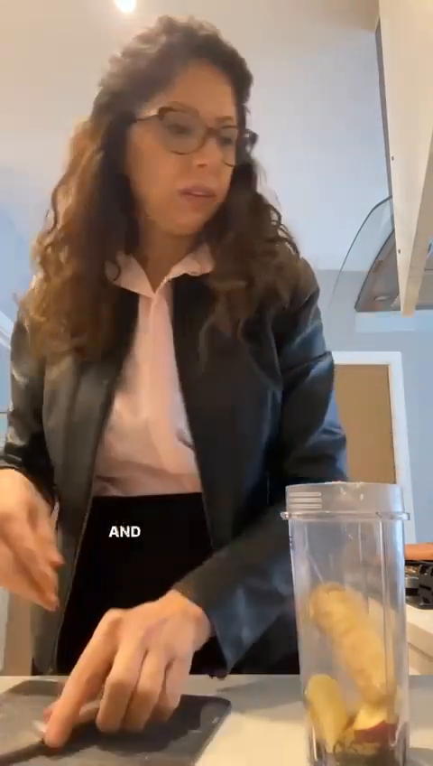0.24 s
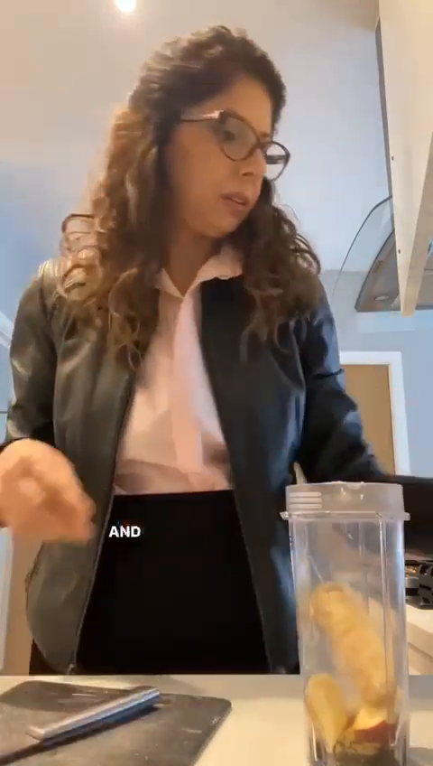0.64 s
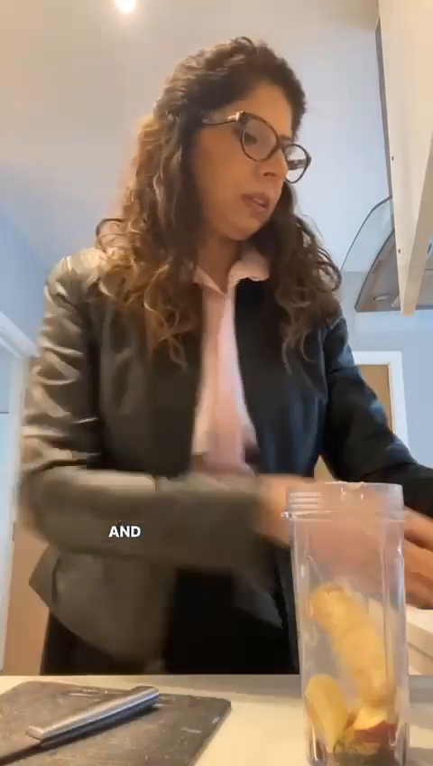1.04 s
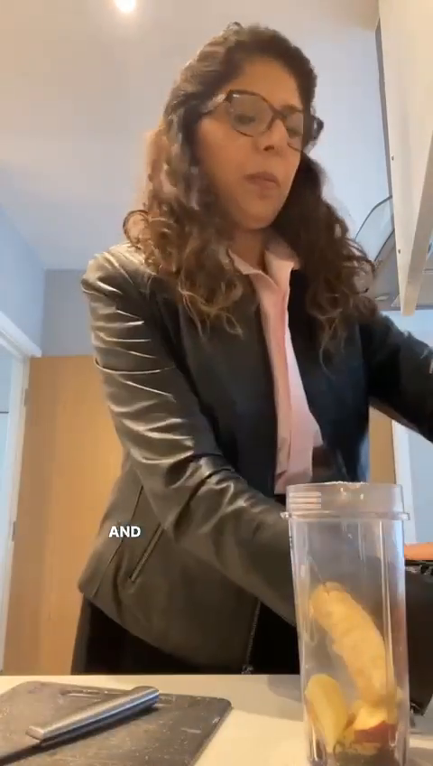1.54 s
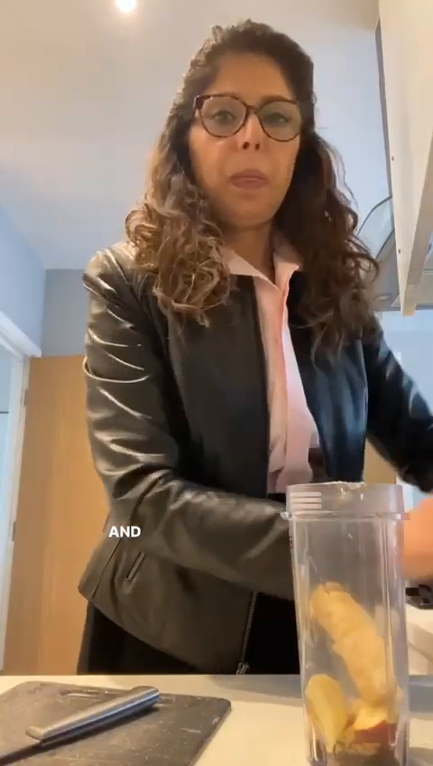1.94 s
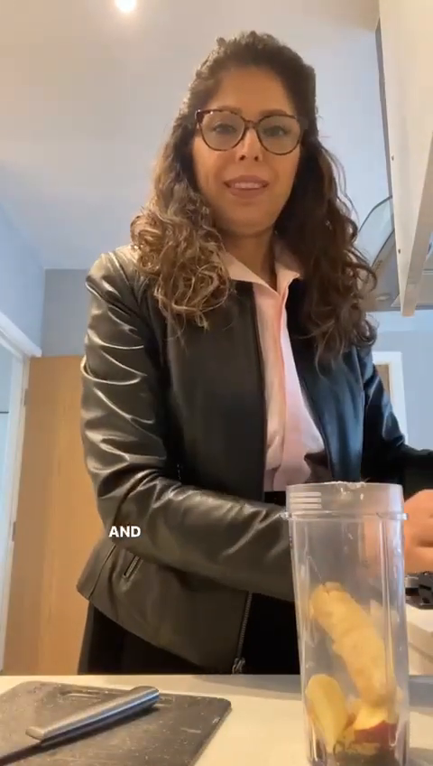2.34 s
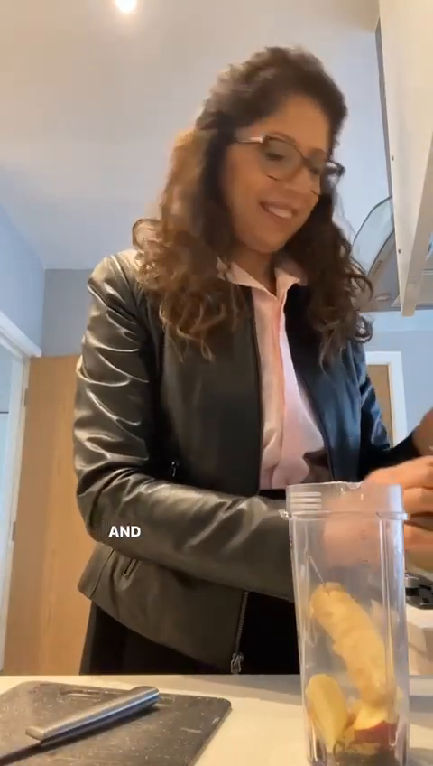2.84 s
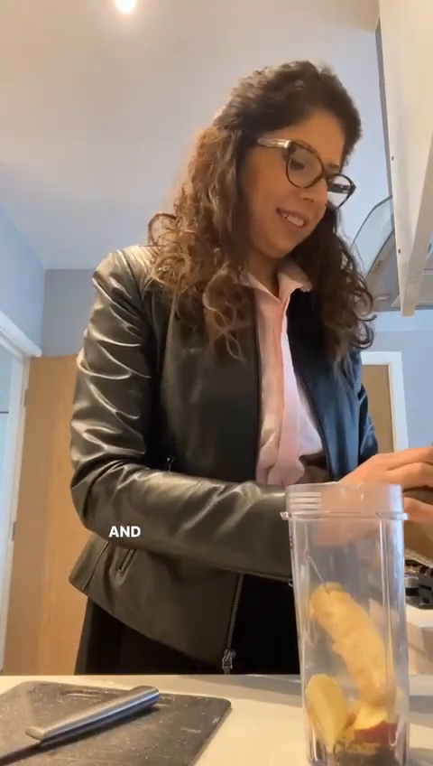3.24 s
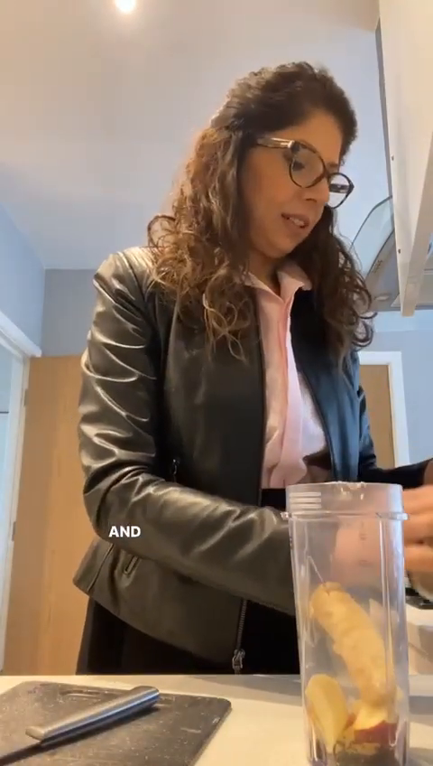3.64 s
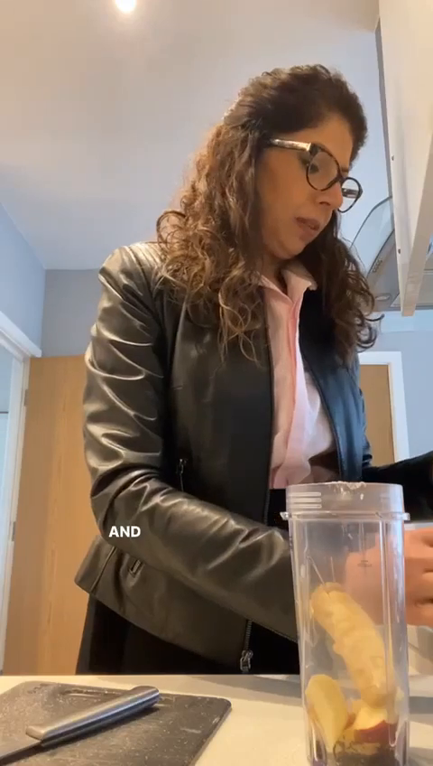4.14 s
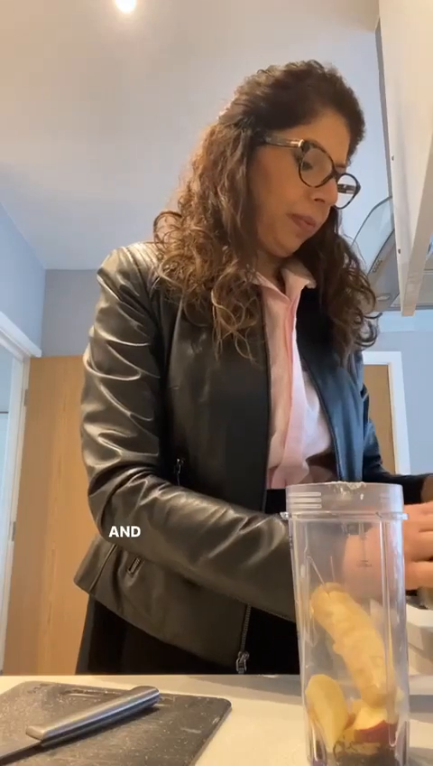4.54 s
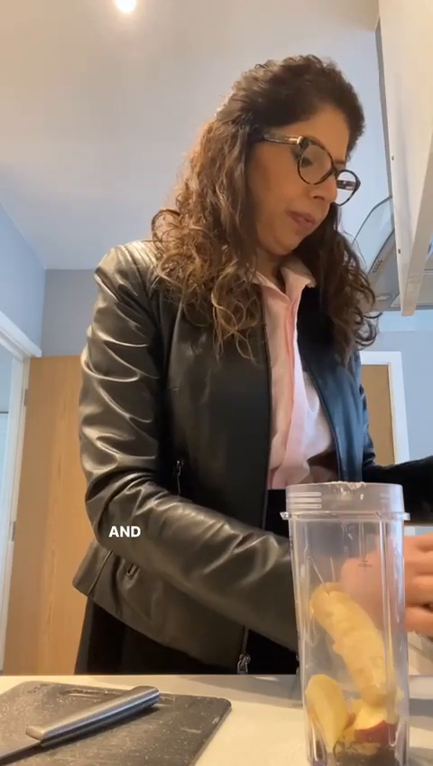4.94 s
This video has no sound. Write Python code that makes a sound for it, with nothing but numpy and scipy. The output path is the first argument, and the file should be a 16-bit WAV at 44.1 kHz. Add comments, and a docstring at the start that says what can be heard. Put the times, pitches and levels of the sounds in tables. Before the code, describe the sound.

Close kitchen handling: a knife clatters down, leather rustles, plastic clicks, brief metal squeaks, and two bright, loud metallic clinks over faint hum.

```python
"""A metal utensil clinks and scrapes in a small kitchen, each clink a set of decaying partials plus dense noise.
A knife lands tip first on a cutting board, things knock on the counter and plastic clicks, all as modal blows.
Filtered noise makes the scrape's squeal, the rustle of a leather sleeve and a low hum.
The room rings after each blow; the phone's limiter ducks on the loudest clinks, then their tails swell back."""
import sys
import numpy as np
from scipy import signal
from scipy.fft import rfft, irfft, next_fast_len
from scipy.io import wavfile
from scipy.ndimage import uniform_filter1d, minimum_filter1d

SR = 44100
rng = np.random.default_rng(int(sys.argv[2]) if len(sys.argv) > 2 else 0)


def wrap_up_sound(samples):
    """Save the sound to the file named by the first command line argument, as 16-bit audio."""
    columns = np.atleast_2d(samples).T
    # keep every value between -1 and 1, then stretch to whole-number steps
    tamed = np.clip(columns, -1, 1)
    steps = np.round(tamed * 32767).astype(np.int16)
    wavfile.write(sys.argv[1], SR, steps)


N = 228066
TIME = np.arange(N) / SR
RING = TIME[:SR // 2]  # time axis of one blow [s]


def undb(db):
    """Decibels to gain."""
    return 10 ** (np.asarray(db) / 20)


def unit(x):
    """Scale to rms 1."""
    return x / np.sqrt(np.mean(x ** 2))


def decay(t, t60):
    """Exponential fade that loses 60 dB in t60 seconds."""
    return np.exp(-np.log(1000) * t / t60)


def add(track, s, sound):
    """Mix a sound in at s seconds."""
    start = int(s * SR)
    track[start:start + len(sound)] += sound[:N - start]


def noise(points, size):
    """Noise of rms 1 with a spectrum of (frequency [Hz], level [dB]) points, joined along log frequency."""
    hz, db = np.transpose(points)
    length = next_fast_len(size)
    bins = np.maximum(np.fft.rfftfreq(length, 1 / SR), 1)
    gain = undb(np.interp(np.log(bins), np.log(hz), db))
    white = rfft(rng.standard_normal(length))
    return unit(irfft(white * gain, length)[:size])


def swell(peak_s, rise_s, fall_s):
    """Gain that grows exponentially to 1 at the peak and dies away after it."""
    return np.exp(-np.maximum((peak_s - TIME) / rise_s, (TIME - peak_s) / fall_s))


def held(start, end, attack_s, release_s):
    """Gain that rises at the start, holds, and is released at the end."""
    attack = 1 - np.exp(-np.maximum(TIME - start, 0) / attack_s)
    release = np.exp(-np.maximum(TIME - end, 0) / release_s)
    return attack * release


def friction(size, grain_db):
    """Countless tiny slips of uneven strength, one each millisecond."""
    step = SR // 1000
    strengths = undb(grain_db * rng.standard_normal(size // step + 1))
    return unit(np.repeat(strengths, step)[:size])


def blow(modes, crack, crack_db, crack_t60, tilt_db, rise):
    """One blow, rms 1 over its first 10 ms: decaying modes and a burst of dense ones; tilt [dB/octave] shapes both."""
    def tilt(f):
        return tilt_db * np.log2(np.maximum(f, 350))  # level below 350 Hz

    hz, db, t60 = np.transpose(modes)
    gain = undb(db + tilt(hz)) * (-1) ** np.arange(len(hz))  # neighbouring modes start in opposite phase
    waves = np.sin(2 * np.pi * hz[:, None] * RING) * decay(RING, t60[:, None])
    ring = gain @ waves / np.linalg.norm(gain)
    tilted_crack = [(f, level + tilt(f)) for f, level in crack]
    burst = noise(tilted_crack, len(RING)) * decay(RING, crack_t60)
    onset = 1 - np.exp(-RING / rise)
    sound = (ring + undb(crack_db) * burst) * onset
    return sound / np.sqrt(np.mean(sound[:SR // 100] ** 2))


def hum():
    """The low hum of the room: steady noise, heaviest in the bass."""
    # spectrum of the hum: (frequency [Hz], relative level [dB])
    hum_spectrum = [(15, -32), (25, -7.5), (91, 3.5), (138, -4.5), (213, -13), (555, -13.5), (737, -21.5),
                    (861, -23), (1010, -24.5), (1090, -19.5), (1440, -28), (4060, -37), (4380, -25),
                    (4730, -43.5), (12000, -36), (15600, -61), (22000, -120)]
    return undb(-56.5) * noise(hum_spectrum, N)


def kitchen(x, early_db, early_t60, late_db):
    """Quick reflections from worktop and cupboards, then a diffuse tail that fades band by band."""
    # decay of the room: (band centre [Hz], t60 [s])
    room_decay = [(100, 0.58), (500, 0.51), (2700, 0.7), (5000, 0.72), (11000, 0.46)]
    t = TIME[:SR]
    bins = np.maximum(np.fft.rfftfreq(SR, 1 / SR), 1)
    hz, t60s = np.transpose(room_decay)
    white = rfft(rng.standard_normal(SR))
    late = np.zeros(SR)
    for band, t60 in zip(np.eye(len(hz)), t60s):
        weight = np.interp(np.log(bins), np.log(hz), band)  # overlapping triangular bands
        late += irfft(white * weight) * decay(t, t60)
    late *= np.clip(t / 0.019, 0, 1)  # the tail builds over 19 ms
    early = rng.standard_normal(SR) * decay(t, early_t60) * (t > .002)
    response = (undb(early_db) * unit(early) + undb(late_db) * unit(late)) / np.sqrt(SR)
    return x + signal.fftconvolve(x, response)[:N]


def sleeve():
    """Leather rustles as the arm moves: grainy friction noise, with a swish at each quick brush."""
    # the moving arm: (time [s], level of the rustle's treble [dB])
    arm = [(0.0, -46.5), (0.33, -55), (0.52, -55.5), (0.89, -55.5), (1.07, -45), (1.41, -47.5),
           (1.65, -44.5), (2.13, -52.5), (2.32, -60.5), (2.48, -54.5), (3.46, -56), (4.05, -63.5),
           (4.29, -68.5), (4.45, -61.5), (4.61, -50.5), (4.85, -68.5), (5.07, -74), (5.17, -74)]
    # quick brushes of the sleeve: (time at the fastest [s], level [dB], swell [s], fade [s])
    brushes = [(1.08, -41.5, 0.074, 0.052), (1.79, -43, .04, 0.02), (2.442, -43.5, 0.069, .04),
               (2.918, -45, .06, .025), (3.58, -47.5, 0.096, 0.044), (4.69, -39.5, 0.079, 0.033)]
    # spectrum of the leather: (frequency [Hz], relative level [dB])
    leather = [(180, -33.5), (300, -10.5), (484, -5), (723, -16), (1240, -11), (1740, -15.5), (3380, -9),
               (3770, -11), (9520, -1), (12000, -9.5), (15600, -37.5), (22000, -120)]
    whole_over_treble_db = 0.5
    rustle = undb(whole_over_treble_db + np.interp(TIME, *np.transpose(arm)))
    swishes = sum(undb(db) * swell(s, rise_s, fall_s) for s, db, rise_s, fall_s in brushes)
    return noise(leather, N) * friction(N, grain_db=1.0) * np.hypot(rustle, swishes)


def clicks():
    """Short dry snaps of handled plastic: a fast-rising crack over a few brief modes."""
    # light plastic clicks: (time [s], level [dB], tilt [dB/octave])
    snaps = [(0.785, -51, -9.5), (0.921, -40, 41), (0.933, -36, 4), (1.286, -27.5, 7), (1.296, -27.5, 3),
             (2.035, -49.5, -5.5), (2.394, -49, -2), (2.442, -43, -1.5), (3.281, -52, 10.5),
             (3.416, -51.5, -1), (4.309, -53, -3.5), (4.842, -50, 2.5), (4.863, -48, 8),
             (5.026, -27.5, 1.5), (5.0352, -25.5, 0.5)]
    # modes of the plastic: (frequency [Hz], relative level [dB], t60 [s])
    plastic = [(484, -1, 0.11), (1054, -2, 0.048), (1300, 3.5, 0.05), (1880, -7, 0.066), (2510, -6, 0.024),
               (4760, 4, 0.023), (6050, -3, 0.12), (8900, 0, 0.014), (9380, 0, 0.061)]
    # spectrum of the crack: (frequency [Hz], relative level [dB])
    plastic_crack = [(30, -26.5), (150, -14), (700, -16.5), (1200, -5), (3000, -5.5), (5000, -1),
                     (9300, 0.5), (11000, -5), (12000, -26.5)]
    out = np.zeros(N)
    for s, db, tilt_db in snaps:
        snap = blow(plastic, plastic_crack, crack_db=10.5, crack_t60=.026, tilt_db=tilt_db, rise=.0003)
        add(out, s, undb(db) * snap)
    return out


def knocks():
    """Things set down and nudged on the counter; a harder contact is brighter and rises faster."""
    # knocks on the counter: (time [s], level [dB], tilt [dB/octave])
    contacts = [(.846, -45.5, -10.5), (.884, -36, 4.5), (.964, -29.5, 5.5), (1.1, -13.5, 1.5),
                (1.121, -19, -2.5), (1.137, -17, -4), (1.15, -30, -2.5), (1.441, -38, -5.5),
                (1.455, -34.5, -7.5), (1.504, -39.5, -5.5), (1.54, -39, -12.5), (4.662, -54.5, -19)]
    # modes of the counter: (frequency [Hz], relative level [dB], t60 [s])
    counter = [(252.2, -9.5, 0.097), (335.3, -3, 0.08), (393, -1.5, 0.11), (463.7, 3, 0.12),
               (578, -4, 0.055), (620, -17.5, 0.12), (843, -6.5, .06), (888, -7, .07), (1075, -8, 0.059),
               (1485, -15.5, 0.052), (2190, -16.5, 0.067), (2900, -20, 0.083)]
    crack = [(25, -40), (90, -21), (250, 1.5), (820, 2.5), (1700, -11.5), (4000, -33.5), (11000, -32.0)]
    rise_at_no_tilt_s, tilt_db_per_halving = 0.0014, 3
    out = np.zeros(N)
    for s, db, tilt_db in contacts:
        rise = rise_at_no_tilt_s * 2 ** (-tilt_db / tilt_db_per_halving)
        knock = blow(counter, crack, crack_db=-2, crack_t60=0.058, tilt_db=tilt_db, rise=rise)
        add(out, s, undb(db) * knock)
    return out


def bounces(s, db, tilt_db, thud_db, count):
    """The hops that follow a drop, each shorter and weaker than the last."""
    first_gap_s, gap_keep = .026, .6  # each gap is this share of the one before
    loss_db, thud_loss_db = 7.5, 3  # per hop
    times = s + np.cumsum(first_gap_s * gap_keep ** np.arange(count))
    return [(t, db - loss_db * k, tilt_db, thud_db - thud_loss_db * k) for k, t in enumerate(times, 1)]


def knife():
    """The tip lands first, then the handle drops and bounces; the board thuds beneath."""
    # knife on the board, tip first, handle last: (time [s], level [dB], tilt [dB/octave], board thud [dB])
    hits = [(.192, -22.5, 0.5, -37), (.218, -31, -0.5, -39), (.3079, -24.5, -0.5, -15),
            (.3171, -19.5, 12, -26)]
    # modes of the blade: (frequency [Hz], relative level [dB], t60 [s])
    blade_modes = [(520.8, -11.5, 0.31), (577, -7.5, 0.24), (1293, -7, 0.062), (1462, -11, 0.078),
                   (1810, 0, 0.071), (2290, -7.5, 0.014), (2606, -12.5, .15), (2880, -2.5, 0.072),
                   (3300, -7, 0.034), (5020, -10, 0.036), (5710, -0.5, 0.014), (6970, -1, 0.022),
                   (7960, -1, 0.013)]
    # modes of board and worktop: (frequency [Hz], relative level [dB], t60 [s])
    board_modes = [(64.4, -4.5, 0.8), (109, -0.5, .3), (136.8, -1, 0.32), (193, -6.5, .18),
                   (261, -8.5, 0.2), (485, 6.5, .09), (582, 7, 0.087), (850, 4, .05), (932, 5.5, 0.042),
                   (1050, -4.5, 0.058)]
    blade_crack = [(40, -53.5), (800, -35.0), (1400, -2.0), (5000, -2.5), (9500, -9.0), (12000, -26.5)]
    board_crack = [(25, -31.5), (60, -5.5), (120, 7), (400, -1.0), (950, -2.5), (2300, -8.0), (8000, -46.5)]
    out = np.zeros(N)
    for s, db, tilt_db, thud_db in hits + bounces(*hits[-1], count=3):
        blade = blow(blade_modes, blade_crack, crack_db=0.5, crack_t60=.035, tilt_db=tilt_db, rise=0.0014)
        board = blow(board_modes, board_crack, crack_db=-2.5, crack_t60=.06, tilt_db=0.5, rise=0.00053)
        add(out, s, undb(db) * blade + undb(thud_db) * board)
    return out


def scrape():
    """Sliding metal: stick and slip drive a narrow squeal that builds in each stroke and jumps where the edge catches."""
    # resonances of the squeal: (frequency [Hz], width [Hz], filter gain [dB])
    resonances = [(6760, 57, 13), (6900, 930, -62), (10600, 200, -8.5), (11680, 130, -10.5)]
    # strokes of metal on metal, pressed harder towards the end: (start [s], end [s], level at the end [dB])
    slides = [(3.096, 3.258, -38.5), (3.35, 3.406, -31)]
    # squeaks where the sliding edge catches: (time [s], length [s], level [dB])
    squeaks = [(3.224, 0.0076, -28.5), (3.263, 0.0077, -25.5), (3.353, 0.0037, -36.5),
               (3.386, 0.0086, -26.5)]
    attack_s, release_s, build_db = .001, 0.0041, 10.5
    slips = rng.standard_normal(N) * friction(N, grain_db=-4)
    squeal = np.zeros(N)
    for hz, width, db in resonances:
        squeal += undb(db) * signal.lfilter(*signal.iirpeak(hz, hz / width, fs=SR), slips)
    strokes, catches = np.zeros(N), np.zeros(N)
    for start, end, db in slides:
        below_end_db = np.interp(TIME, [start, end], [build_db, 0])
        strokes += held(start, end, attack_s, release_s) * undb(db - below_end_db)
    for s, length, db in squeaks:
        catches += held(s, s + length, attack_s, release_s) * undb(db)
    return unit(squeal) * np.hypot(strokes, catches)


def clusters(modes):
    """Spectrum (Hz, dB) of the metal's dense modes: a hump around each strong mode on a broad base."""
    # dense modes between the clusters: (frequency [Hz], level [dB])
    metal_crack = [(30, -35.5), (200, -32), (1000, -30), (1800, -26), (2550, -13), (3800, -11.5),
                   (4700, -13), (7000, -2), (10000, -10.5), (12000, -15)]
    width_hz, lift_db = 80, 8
    grid = np.arange(30, 13000, 40)
    humps = sum(undb(db + lift_db) / (1 + ((grid - hz) / width_hz) ** 2) for hz, db, _ in modes)
    base = undb(np.interp(grid, *np.transpose(metal_crack)))
    return np.column_stack([grid, 20 * np.log10(np.hypot(humps, base))])


def free_ring(hz, db, length):
    """The faint, long twin (Hz, dB, t60 s) of a mode: weaker and shorter for high partials, shorter in a tight grip."""
    below_mode_db, longest_t60 = -29, 0.69
    knee_hz, fall_power, db_per_octave = 2690, 0.32, -3.5  # above the knee it shortens and weakens
    octaves = np.log2(max(hz / knee_hz, 1))
    level_db = db + below_mode_db + db_per_octave * octaves
    t60 = longest_t60 * min(length, 1) * 2 ** (-fall_power * octaves)
    return hz, level_db, t60


def clinks():
    """The place struck picks the modes; a clean contact favours one and hardly rattles; a loose grip lets them ring."""
    # utensil clinks: (time [s], level [dB], place struck [0 tip to 1 handle], tilt [dB/octave], rise [s],
    # partial that the contact favours [Hz], its lift [dB], ring length [factor])
    strikes = [(.862, -36.5, 0, 2.5, 0.014, 4730, 3, 0.63),
               (.885, -37.5, 0.46, -10, 0.0013, 3385, 10, 0.57),
               (.963, -29.5, 0.5, -10.5, .0027, 3385, 17, 0.74),
               (1.1, -30.5, 0.69, 0, 0.00076, 3385, 17, 1.6), (1.228, -35, 1, 3, 0.0048, 3385, 21.5, 1.36),
               (1.51, -16, 0.0021, -0.5, 0.002, 6570, 2.5, 0.67),
               (1.6142, -12, 1, -2, 0.00095, 6570, 6, 0.74), (1.628, -17, 1, 5, 0.00045, 5500, 5, 1.36),
               (2.241, -51.5, .6, 6, 0.037, 6570, 6, 3.6), (2.288, -42.5, 0.23, 13, 0.0026, 8470, 10, 0.71),
               (2.484, -0.5, 0.63, 0, 0.00073, 7400, 6, 1.47),
               (2.924, -38.5, 0.52, 7.5, 0.0072, 7400, 17, 1.5),
               (2.947, -21, 0.64, -4.5, 0.0014, 2720, 7, 1.24),
               (2.967, -33, 0.9, -5.5, 0.0018, 2770, 4, 2.6), (3.077, -30, 0.49, -5.5, 0.00027, 2630, 2, 2),
               (3.657, -46, 1, 12.5, 0.0028, 5610, 15, 0.56),
               (3.743, -49, 0.42, 8.5, .005, 6170, 11.5, 1.15), (3.783, -52.5, .31, 4, .0035, 4905, 2, .8),
               (3.914, -44.5, 0.81, 4.5, .001, 4460, 11, 2.4), (4.161, -49, 0.94, 2.5, .001, 4420, 16, 2.2),
               (4.4286, 5, 0, -0.5, 0.00057, 4800, 4.5, 1.2)]
    # utensil modes, singing partials first: (frequency [Hz], level struck at the tip [dB],
    # in the middle [dB], at the handle [dB], t60 at ring length 1 [s])
    utensil = [(2686, -4, -3, -24, .09), (3385, -15, -12, -5, .07), (4460, -10, -12, -2, .05),
               (4905, -1, -4, -12, .075), (5675, -16, -8, -4, .06), (6185, -17, -5, -18, .05),
               (6570, -1, -7, -1, .07), (2380, -22, -14, -36, .04), (2600, -13, -8, -26, .05),
               (2770, -13, -9, -24, .05), (4780, -8, -1, -2, .06), (5745, -18, -18, -5, .06),
               (7405, -3, -3, -13, .05), (8470, -12, -6, -14, .045), (9900, -4, -12, -16, .045),
               (10650, -20, -22, -13, .035), (11500, -18, -32, -13, .02)]
    grip_after_s, grip_damp_s = 0.33, .035  # the hand then closes on the metal and stops it
    grip = np.exp(-np.maximum(RING - grip_after_s, 0) / grip_damp_s)
    out = np.zeros(N)
    for s, db, place, tilt_db, rise, lead_hz, lead_db, length in strikes:
        struck = [(hz, np.interp(place, [0, .5, 1], dbs), t60 * length) for hz, *dbs, t60 in utensil]
        modes = []
        for hz, level, t60 in struck:
            lift_db = lead_db * np.exp(-((hz - lead_hz) / 150) ** 2)
            modes.append((hz, level + lift_db, t60))
        free = [free_ring(hz, level, length) for hz, level, _ in modes]
        rattle_db = 3 - .5 * lead_db  # the more a contact lifts one partial, the less it rattles
        clink = blow(modes + free, clusters(struck), crack_db=rattle_db, crack_t60=0.052 * length,
                     tilt_db=tilt_db, rise=rise)
        add(out, s, undb(db) * grip * clink)
    return out


def scene():
    """Each struck or sliding thing has its own balance of reflections in the same humming room."""
    plastic = kitchen(clicks(), early_db=-5.5, early_t60=0.17, late_db=-15)
    counter = kitchen(knocks(), early_db=-5.0, early_t60=0.066, late_db=-11.0)
    board = kitchen(knife(), early_db=-12.0, early_t60=0.28, late_db=-19.0)
    sliding = kitchen(scrape(), early_db=-9.0, early_t60=0.068, late_db=-17.5)
    metal = kitchen(clinks(), early_db=-12.0, early_t60=0.29, late_db=-19.5)
    return (hum() + sleeve() + plastic + counter + board + sliding + metal)[None]


def limiter(x, ceiling_db, release_db_per_s):
    """The gain drops just ahead of a peak and climbs back at a steady rate."""
    over = np.maximum(20 * np.log10(np.abs(x).max(axis=0) + 1e-9) - ceiling_db, 0)
    climb = release_db_per_s * TIME
    gain_db = climb - np.maximum.accumulate(over + climb)
    ahead = SR // 500  # 2 ms window
    return x * undb(uniform_filter1d(minimum_filter1d(gain_db, ahead), ahead))


def record(dry):
    """The microphone chain loses the deepest bass and limits the peaks; the finished sound is band-limited to 12 kHz."""
    band = signal.sosfilt(signal.butter(2, 40, "highpass", fs=SR, output="sos"), dry)
    limited = limiter(band, ceiling_db=-2.5, release_db_per_s=48)
    return signal.sosfilt(signal.ellip(10, .2, 75, 12000, fs=SR, output="sos"), limited)


dry = scene()
out = record(dry)
wrap_up_sound(out)
```